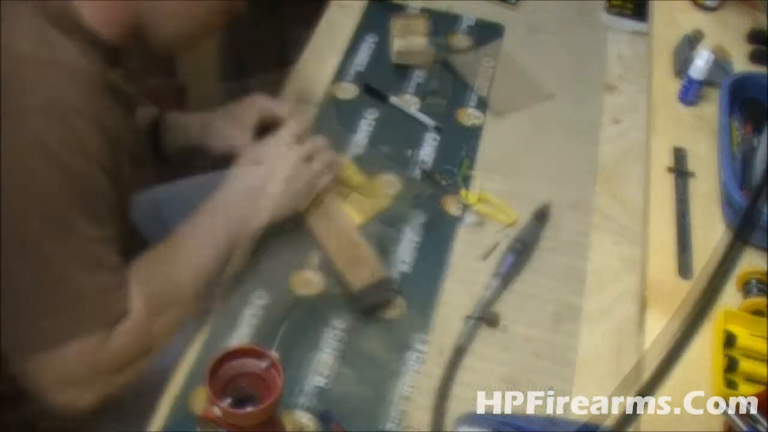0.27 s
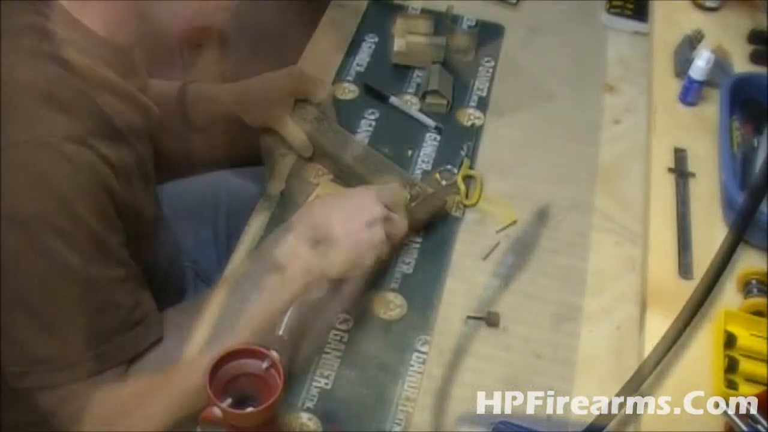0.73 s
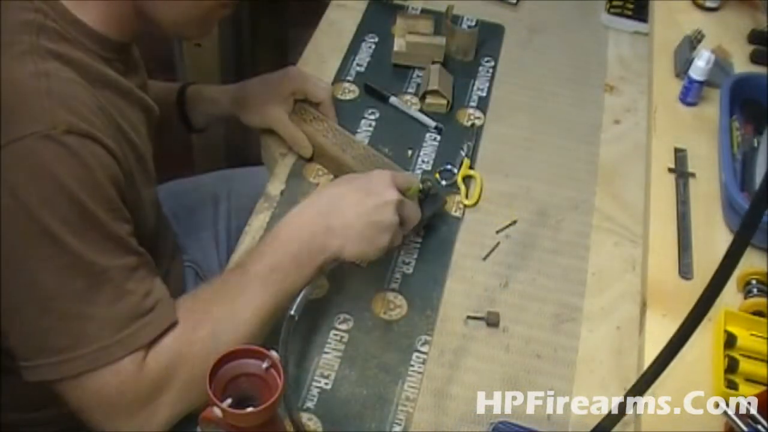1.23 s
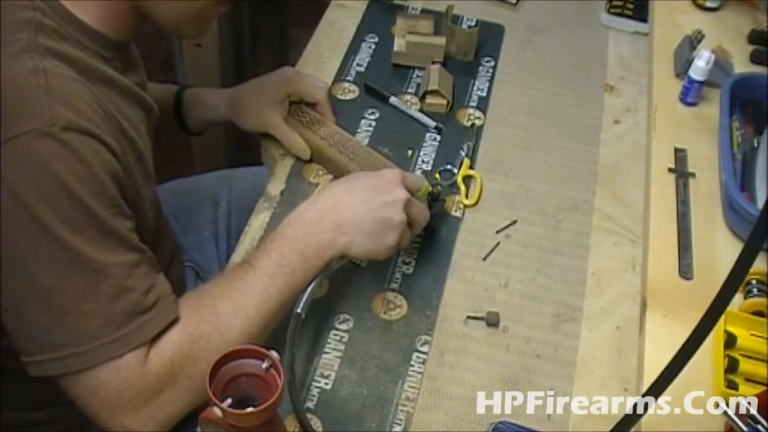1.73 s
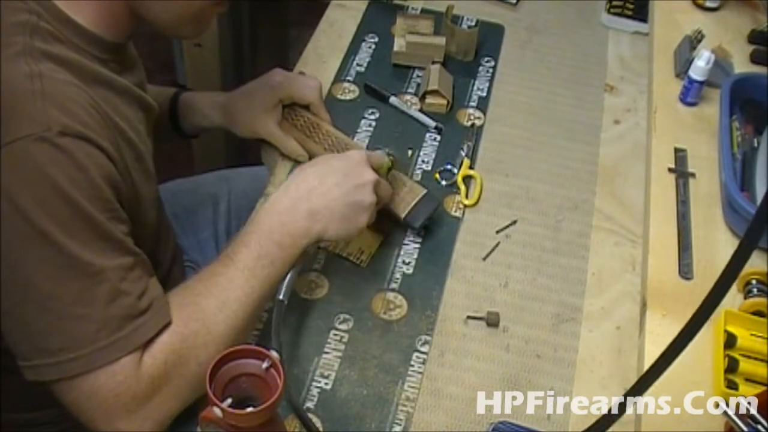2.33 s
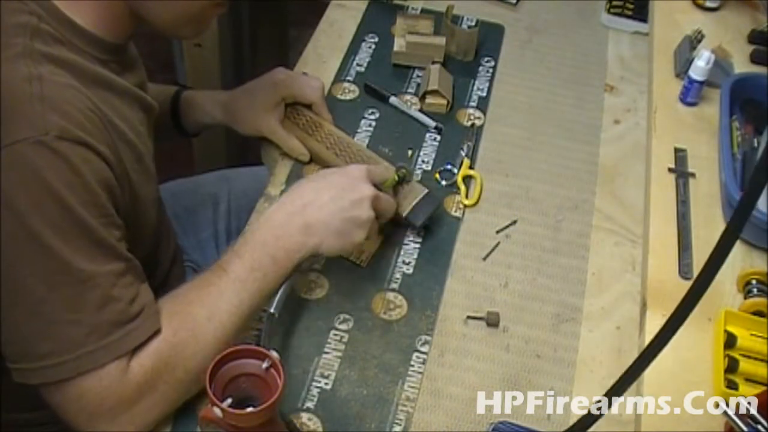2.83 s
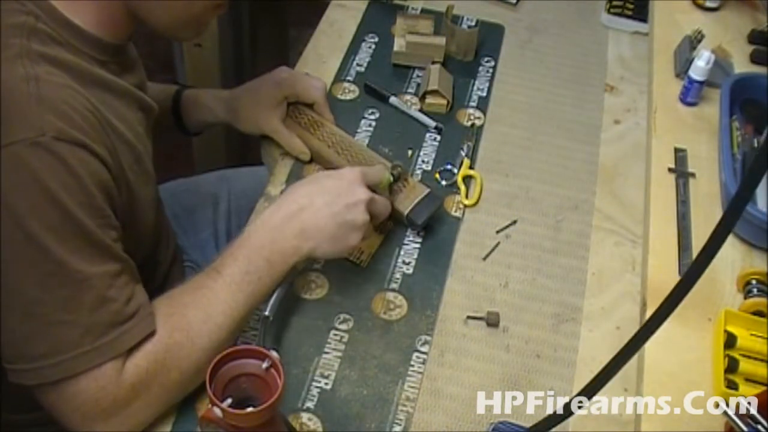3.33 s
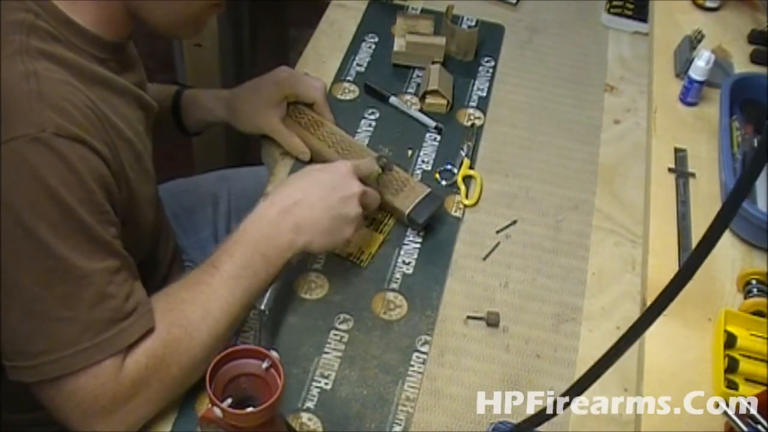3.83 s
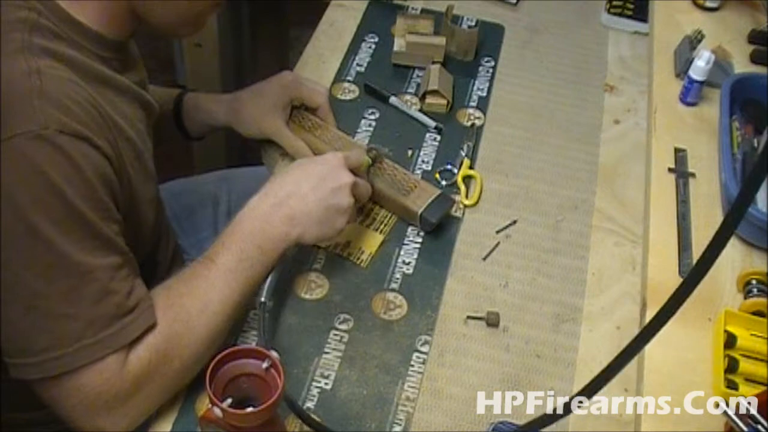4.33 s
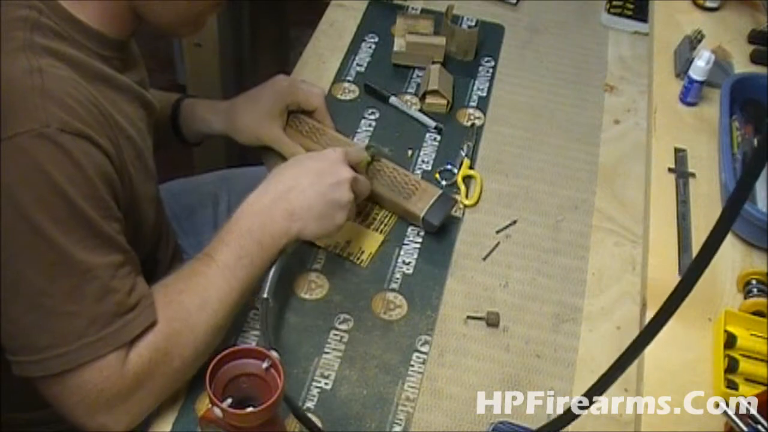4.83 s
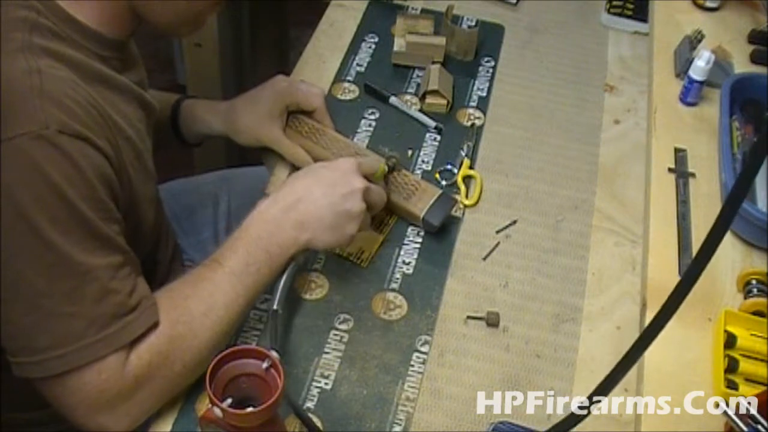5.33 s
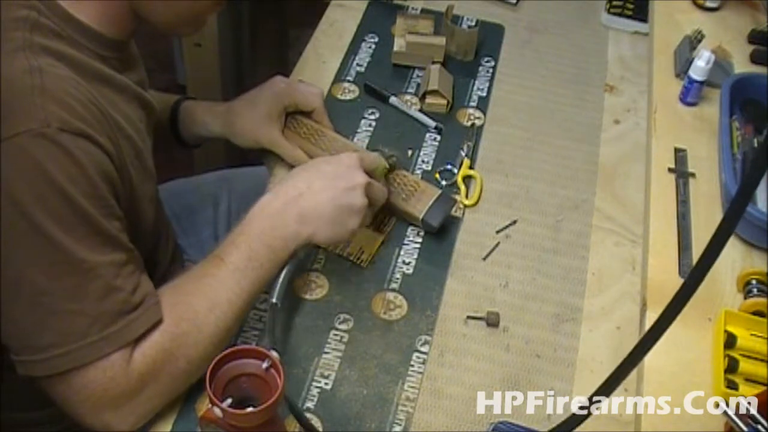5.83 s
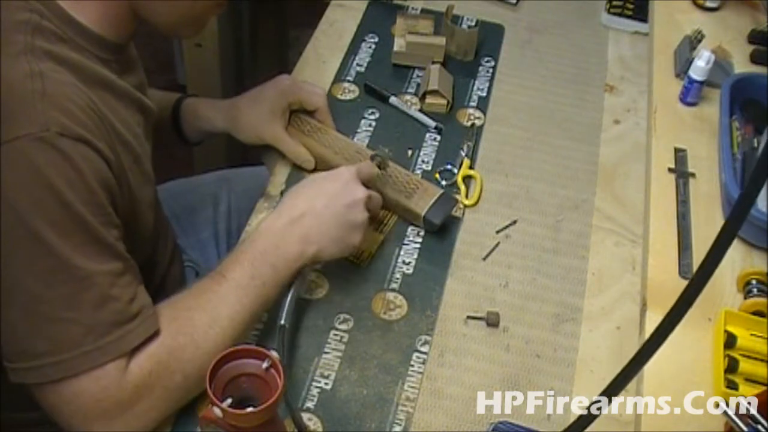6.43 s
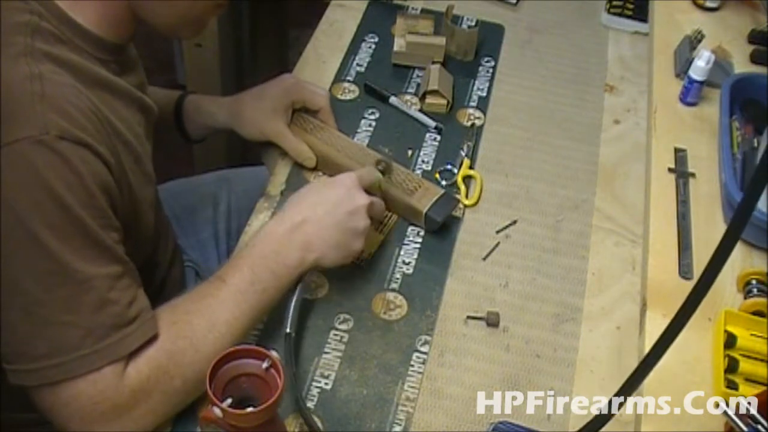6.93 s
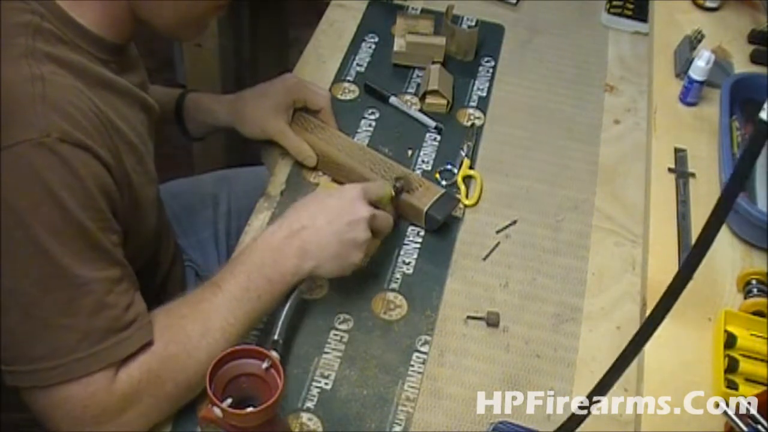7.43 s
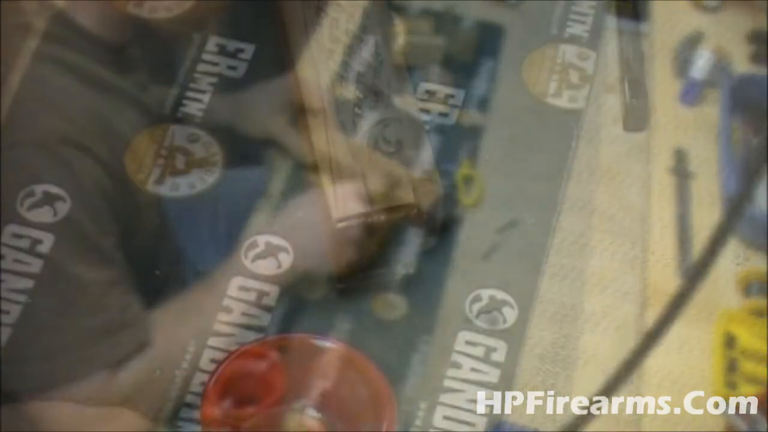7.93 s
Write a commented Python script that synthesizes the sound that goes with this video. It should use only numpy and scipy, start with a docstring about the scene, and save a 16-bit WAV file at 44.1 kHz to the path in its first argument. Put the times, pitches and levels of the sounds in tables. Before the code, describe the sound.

A handheld rotary grinder whines shrill and steady on a workshop bench, its pitch sagging and recovering as the bit works along wood.

```python
"""A rotary grinder whines on a workshop bench, its pitch sagging at each push of the bit along the work.
The fan-blade tone leads; shaft orders, mains side tones and bearing tones turn with the same shaft.
Air and cutting hiss is shaped noise that throbs with the mains and each turn, over low rumble and hum.
It is heard in the shop's echoes by a microphone whose two ports sit close together."""
import sys
import numpy as np
from scipy import signal
from scipy.io import wavfile
from scipy.ndimage import uniform_filter1d

SR = 44100
rng = np.random.default_rng(int(sys.argv[2]) if len(sys.argv) > 2 else 0)


def persist_wave(psi):
    """Save psi, clipped to +-1, as 16-bit WAV."""
    counts = np.round(np.clip(psi, -1, 1) * 32767).astype(np.int16)
    wavfile.write(sys.argv[1], SR, np.atleast_2d(counts).T)


N = 361179  # samples
BLADES = 18  # fan blades on the shaft
PULSATION_HZ = 120  # mains torque pulsation


def motor(t):
    """Sums the fan, shaft orders, side tones and bearings, all driven by one turning shaft."""
    speed = shaft_speed(t)
    turns = np.cumsum(speed) / SR
    out = fan_blades(t, speed, turns)
    out += strong_orders(speed, turns)
    out += weaker_orders(t, speed, turns)
    out += faint_orders(t, speed, turns)
    out += bearings(speed, turns)
    return out + hum_on_turn(t, speed, turns)


# The shaft as the hand leans on the bit and eases off. Each row: time in seconds, speed in turns per s.
LOAD_CURVE = [(0.0, 370.8), (0.3, 365.5), (0.59, 360.1), (1.2, 359.4), (1.61, 363.9), (2.18, 356.0),
              (2.49, 363.3), (2.64, 365.9), (3.06, 364.6), (3.45, 352.7), (3.74, 352.3), (4.13, 355.1),
              (4.54, 343.2), (4.73, 347.7), (4.98, 346.6), (5.51, 360.3), (5.82, 353.2), (6.07, 356.5),
              (6.35, 369.8), (6.64, 363.5), (6.98, 348.8), (7.4, 347.0), (7.57, 348.9), (7.78, 343.3),
              (8.19, 346.5)]
# Each push of the bit along the work. Each row: centre in seconds, sag of the speed in turns per s.
STROKES = [(0.13, 2.9), (0.34, 2.5), (0.56, 2.3), (0.77, 2.9), (0.98, 2.4), (1.2, 1.9), (1.43, 2.8),
           (1.62, 4.1), (1.83, 3.1), (2.04, 2.5), (2.3, 3.4), (2.56, 0.8), (2.79, 2.1), (3.02, 2.2),
           (3.29, 4.1), (3.53, 2.1), (3.78, 2.8), (4.08, 2.8), (4.38, 2.3), (4.65, 2.8), (4.85, 2.2),
           (5.14, 2.6), (5.44, 0.7), (5.56, 3.3), (5.7, 3.5), (5.94, 1.5), (6.21, 2.4), (6.36, 1.8),
           (6.72, 4.1), (6.86, 3.4), (7.24, 0.6), (7.49, 2.3), (7.95, 2.3)]
STROKE_S = .045  # bell width (sigma) of a sag


def shaft_speed(t):
    """Turns per second: the slow load curve, less a short sag at every stroke."""
    return follow(LOAD_CURVE, t)[0] - bumps(STROKES, STROKE_S, t)


# Fan tone, loud or weak by pitch among the echoes of the bench. Each row: pitch in Hz, level in dB.
BLADE_PATH = [(6174.0, -25), (6219.0, -25), (6246.0, -21), (6269.0, -14.5), (6318.0, -18), (6359.0, -16),
              (6417.0, -15), (6467.0, -13.5), (6503.0, -15.5), (6539.0, -14.5), (6579.0, -20.5),
              (6624.0, -24), (6660.0, -23.5)]
# Brief dips of the fan tone. Each row: centre in seconds, change in dB.
BLADE_FADES = [(.98, -2), (1.2, -4), (1.49, -3), (1.67, -2.5), (1.98, -5.5), (2.91, -15), (3.48, -3),
               (3.71, -2), (4.07, -3), (4.24, -5), (4.36, -7), (4.53, -1), (5.12, -13), (6.41, -6),
               (7.09, -3.5), (7.47, -17), (7.73, -12)]
FADE_S = 0.025  # bell width (sigma) of a dip
START_LIFT_DB, START_S = 4, 0.25  # the fan tone is stronger at the start, then settles; time scale


def fan_blades(t, speed, turns):
    """Every blade passing gives one cycle, so the tone sits at the blade count times the shaft speed."""
    level_db = read(BLADE_PATH, BLADES * speed)[0]
    level_db = level_db + bumps(BLADE_FADES, FADE_S, t)
    level_db += START_LIFT_DB * np.exp(-(t / START_S) ** 2)
    level_db += spread(0.59 * drift(29.0))
    return tone(BLADES * turns, level_db, BLADES * speed.mean(), waver_db=1.23, blur=0.2)


# Speeds, slow to fast, at which the strong orders are given. Each entry: turns per s.
FINE_SPEEDS = (343, 346.5, 349.5, 353, 358, 363, 368)
# Strong multiples of the turn rate. Each row: shaft order, then level in dB at each of the seven speeds.
STRONG_ORDERS_DB = [(1.0, -40.5, -38.5, -40.7, -44.6, -37.6, -32.4, -33.5),
                    (2.0, -45.5, -42.5, -40, -34.5, -37, -36, -39),
                    (3.0, -36.2, -42.5, -40.5, -37.5, -31.5, -31.5, -25.5),
                    (7.0, -47, -27, -34, -33.5, -30, -35.1, -51),
                    (4.0, -25.5, -29.3, -31.5, -36, -39, -38.6, -33.5),
                    (8.0, -36, -28.8, -27.5, -32, -32, -29.5, -25.5),
                    (12.0, -37, -41.5, -37, -34.5, -39.5, -33.5, -33),
                    (13.0, -36, -39.6, -40, -33, -40, -40.4, -35)]
# Orders that break up under load. Each entry: shaft order.
FRAYING = (2, 3, 12, 13)
FRAY_DB, FRAY_BELOW = 2.5, 356  # rms depth when fully loaded; speed where it sets in, turns per s


def strong_orders(speed, turns):
    """Whole multiples of the turn rate, some breaking up as the load slows the shaft."""
    out = 0
    for order, *db in STRONG_ORDERS_DB:
        order = round(order)
        load = np.clip((FRAY_BELOW - speed) / 6.3, 0, 1)
        fray_db = FRAY_DB * load * spread(drift(22.0)) * (order in FRAYING)
        level_db = np.interp(speed, FINE_SPEEDS, db) + fray_db
        out += tone(order * turns, level_db, order * speed.mean(), waver_db=min(0.92 * order, 1.8), blur=0.18)
    return out


# Shaft speeds from loaded to free, also used by the hiss. Each entry: turns per s.
SPEEDS = (346, 352.5, 358, 364)
# Weaker multiples of the turn rate. Each row: shaft order, then level in dB at each of the four speeds.
ORDERS_DB = [(5, -35, -35, -37, -35), (6, -33, -34, -42, -34), (15, -43, -43, -41, -36),
             (16, -41, -38, -39, -37), (17, -34, -35, -41, -41), (19, -35, -45, -38, -34),
             (20, -35, -37, -37, -33), (21, -35, -33, -35, -32), (22, -36, -40, -42, -36),
             (23, -36, -30, -36, -33), (24, -33, -36, -34, -31), (25, -42, -40, -36, -35),
             (26, -32, -37, -37, -39), (27, -42, -38, -38, -37), (29, -36, -40, -45, -46),
             (31, -48, -50, -46, -41)]
# Tones beside an order. Each row: shaft order, steps of the mains pulsation away from it,
# then level in dB at each of the four speeds.
SIDE_TONES = [(4, -1, -35.5, -36, -38.5, -36.5), (8, -2, -42, -52, -48, -51),
              (8, -1, -26.5, -35.5, -39, -40), (8, 1, -36.5, -48, -40, -58), (8, 2, -43, -38, -47, -37.5),
              (18, 1, -43, -38, -48, -50)]


def weaker_orders(t, speed, turns):
    """The casing favours other orders and side tones as the speed moves them across its resonances."""
    out = 0
    plain = [(order, 0, *db) for order, *db in ORDERS_DB]
    for order, step, *db in plain + list(SIDE_TONES):
        order, step = round(order), round(step)
        cycles = order * turns + step * PULSATION_HZ * t
        level_db = np.interp(speed, SPEEDS, db)
        out += tone(cycles, level_db, order * speed.mean(), waver_db=min(0.36 * order, 3.1), blur=0.11)
    return out


# Faint orders and side tones. Each row: shaft order, steps of the mains pulsation away from it.
FAINT = ((5, -1), (7, 1), (9, 0), (10, 0), (11, 0), (14, 0), (11, 1), (13, 1), (16, -1))
FAINT_DB = -44


def faint_orders(t, speed, turns):
    """Faint orders and mains side tones, at one mean level whatever the speed."""
    out = 0
    for order, step in FAINT:
        cycles = order * turns + step * PULSATION_HZ * t
        out += tone(cycles, FAINT_DB, order * speed.mean(), waver_db=4.0, blur=0.18)
    return out


# Cage and ball-pass tones between the orders. Each entry: cycles per turn.
BEARING = (.23, 4.085, 5.17, 7.17, 9.17)
# Their levels in the same order. Each entry: level in dB.
BEARING_DB = (-64, -35.5, -44, -40, -45)


def bearings(speed, turns):
    """Cage and balls pass at fractional multiples of the turn rate."""
    out = 0
    for per_turn, db in zip(BEARING, BEARING_DB):
        out += tone(per_turn * turns, db, per_turn * speed.mean(), waver_db=2.5, blur=0.1)
    return out


def hum_on_turn(t, speed, turns):
    """The mains pulsation on the turning shaft gives a side tone above the first order."""
    return tone(turns + PULSATION_HZ * t, -57.5, speed.mean(), waver_db=5.0, blur=0.33)


# Hiss colour at the left port. Each row: frequency in Hz, relative density in dB per Hz.
HISS = [(100, -32), (300, -27.5), (600, -14.5), (950, -11), (1350, -5), (1800, -6.5), (2700, -7.5),
        (3400, -10.5), (5000, -7), (7400, 0.5), (8600, -3), (10000, -5.5), (11000, -10), (13000, -19),
        (14900, -34)]
# Hiss level at each of the four SPEEDS. Each entry: level in dB.
HISS_DB = (-15, -16, -17.5, -15.5)
# The hiss thins once as the bit lifts. Each row: centre in seconds, change in dB.
HISS_LULL = [(5.38, -2)]
LULL_S = 0.032  # bell width (sigma) of the lull


def hiss(t):
    """Air from the fan and grit under the bit: patchy noise that throbs with mains torque and each turn."""
    patches = rng.standard_normal((N // 256 + 5, 513)).T
    patches = uniform_filter1d(patches, 20, 0)  # across frequency
    patches = evened(uniform_filter1d(patches, 14, 1))  # across time
    bite_db = .5 * drift(56.0)  # the cut bites unevenly
    speed = shaft_speed(t)
    turns = np.cumsum(speed) / SR
    mains_throb = 0.022 * np.cos(2 * np.pi * PULSATION_HZ * t)
    turn_throb = 0.17 * np.cos(2 * np.pi * turns)
    level_db = np.interp(speed, SPEEDS, HISS_DB) + bumps(HISS_LULL, LULL_S, t) + spread(bite_db)
    return gain_of(level_db) * (1 + mains_throb + turn_throb) * noise(HISS, 0.87 * patches)


# Rumble colour at the left port. Each row: frequency in Hz, relative density in dB per Hz.
RUMBLE = [(25, -12), (80, 2), (165, -2), (250, 4.5), (700, -0.5), (1500, -19)]
# Base level that rumble and hum both follow. Each row: time in seconds, level in dB.
RUMBLE_DB = [(0, -47.5), (1, -52.5), (4.2, -50), (4.7, -47.5), (5.1, -51), (7.3, -50.5), (7.55, -39.5),
             (8.19, -45.5)]


def bench(t):
    """Low rumble and mains hum that the bench passes on, in uneven swells."""
    level_db = follow(RUMBLE_DB, t)[0]
    hum = tone(PULSATION_HZ * t, level_db - 5, PULSATION_HZ, waver_db=2.5, blur=.3)
    swells_db = spread(2.1 * drift(12.))
    return hum + gain_of(level_db + 2.5 + swells_db) * noise(RUMBLE, 0)


# Right microphone port against the left, close beside it. Each row: frequency in Hz, likeness from 0 to 1,
# lag in radians, how much louder the left is in dB.
PORTS = [(60, .98, 0, -.3), (200, .92, 0, -.3), (400, .98, 0, -.3), (1000, .95, 0, -.2), (1700, .985, 0, 0),
         (2700, .93, 0, -.6), (3500, .998, 0, 0), (5200, .999, 0, 0), (6300, .95, 0, -.7),
         (7300, .94, .15, 0), (8200, .84, .4, 2.7), (8950, .25, .3, 6.5), (9300, .4, -2.8, 6),
         (10000, .69, -2.4, 5), (12000, .59, -1.9, 2), (14900, .3, -1.2, 1)]


def tone(turns, db, mean_hz, waver_db, blur):
    """One partial at both ports; echoes of the shop make its level and phase (blur, radians) wander."""
    like, lag, lean_db = read(PORTS, mean_hz)
    coarse_db = (db + np.zeros(N))[::128] + waver_db * drift(93.0)
    size = np.sqrt(2) * spread(gain_of(coarse_db))  # db is an rms level
    angle = 2 * np.pi * (turns + rng.random()) + spread(blur * drift(52.0))
    # the ports do not hear quite the same echoes
    apart = spread(0.72 * np.arccos(np.clip(like, 0, 1)) * drift(5.8))
    left = np.sin(angle)
    right = gain_of(-lean_db) * np.sin(angle - lag + apart)
    return size * np.array([left, right])


def noise(spectrum, field_db):
    """Random short-time spectra at the two ports, with a level field over frequency and frames."""
    hz = np.fft.rfftfreq(1024, 1 / SR)
    a, b, c, d = rng.standard_normal((N // 256 + 5, 513, 4)).T
    like, lag, lean_db = (column[:, None] for column in read(PORTS, hz))
    like = np.clip(like, 0, 1)
    left = a + 1j * b
    right = like * left * np.exp(-1j * lag) + np.sqrt(1 - like ** 2) * (c + 1j * d)
    colour_db = read(spectrum, hz)[0][:, None] + field_db
    frames = np.array([left, gain_of(-lean_db) * right]) * gain_of(colour_db)
    return evened(signal.istft(frames, nperseg=1024, noverlap=768)[1][:, :N])


def gain_of(db):
    """Decibels to amplitude."""
    return 10 ** (np.asarray(db) / 20)


def evened(x):
    """Scales to an rms of one."""
    return x / np.sqrt(np.mean(x ** 2) + 1e-20)


def read(table, hz):
    """Every column of a table at the given frequencies, on a log axis."""
    f, *columns = np.transpose(table)
    return [np.interp(np.log(hz + 1), np.log(f + 1), c) for c in columns]


def follow(table, t):
    """Every column of a curve at the times t."""
    s, *columns = np.transpose(table)
    return [np.interp(t, s, c) for c in columns]


def drift(hz):
    """Smooth chance of rms one, a value every 128 samples, alike over about 1 / hz seconds."""
    bell = np.exp(-.5 * (np.arange(-200, 201) * 128 * hz / SR) ** 2)
    return evened(np.convolve(rng.standard_normal(N // 128 + 1), bell, "same"))


def spread(knots):
    """From a value every 128 samples to every sample."""
    return np.interp(np.arange(N), np.arange(len(knots)) * 128, knots)


def bumps(events, width, t):
    """A bell of the given width (sigma, seconds) and height at each event."""
    coarse = t[::128]
    return spread(sum(size * np.exp(-.5 * ((coarse - s) / width) ** 2) for s, size in events))


def scene():
    """Grinder, hiss and bench at the two ports."""
    t = np.arange(N) / SR
    return motor(t) + hiss(t) + bench(t)


def record(dry):
    """The microphone loses the deep bass, full scale clips any higher peaks; then the treble is cut."""
    thin = signal.sosfilt(signal.butter(2, 70, "high", fs=SR, output="sos"), dry)
    held = np.clip(thin, -1, 1)
    band_limit = signal.firwin(511, 15050, window=("kaiser", 9), fs=SR)  # cutoff in Hz
    return signal.oaconvolve(held, band_limit[None], "same")


dry = scene()
out = record(dry)
persist_wave(out)
```